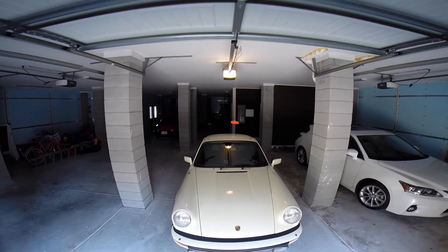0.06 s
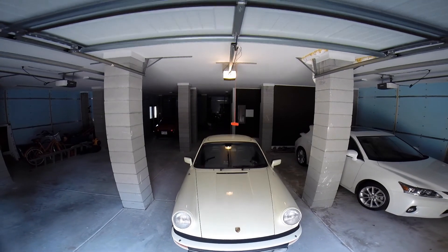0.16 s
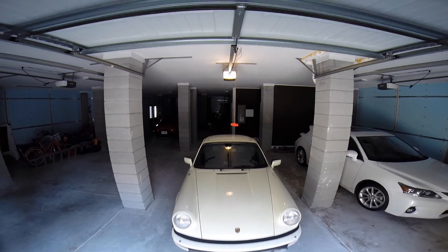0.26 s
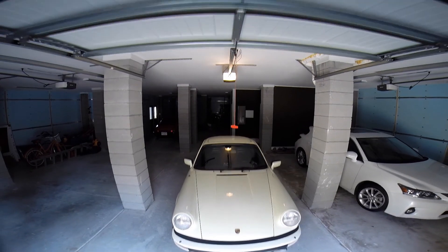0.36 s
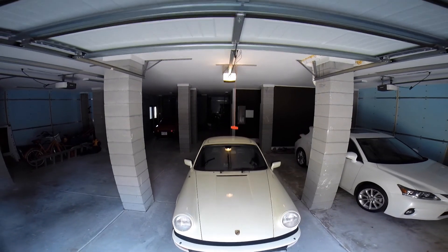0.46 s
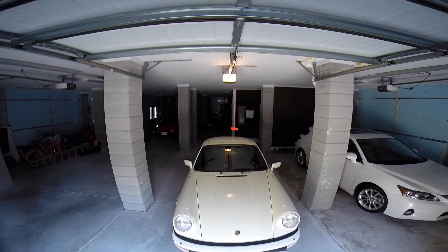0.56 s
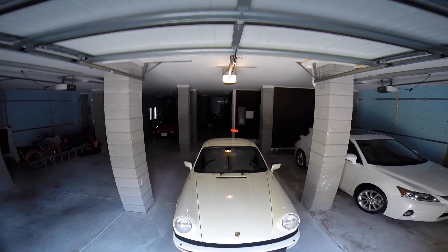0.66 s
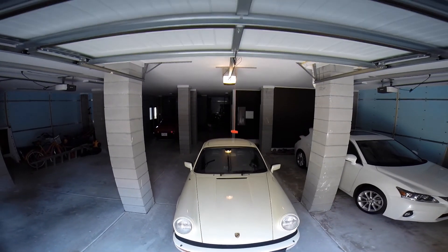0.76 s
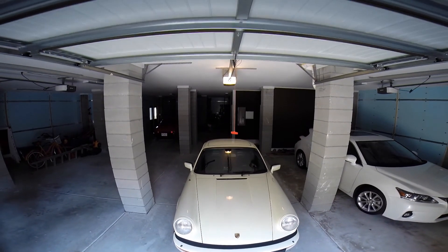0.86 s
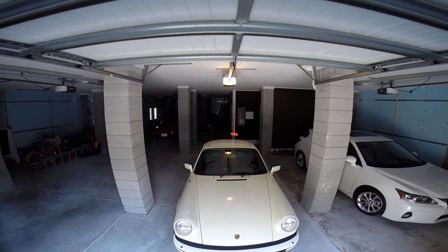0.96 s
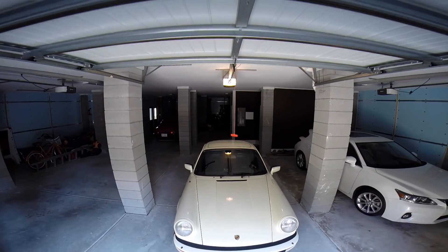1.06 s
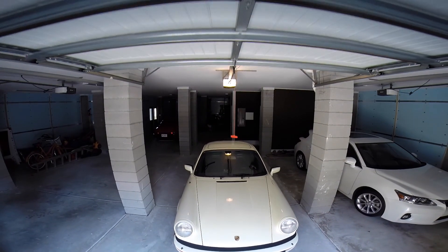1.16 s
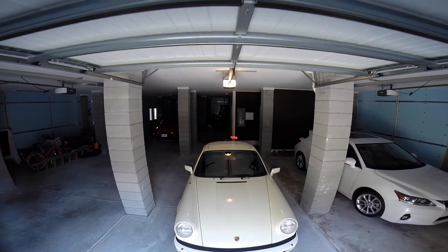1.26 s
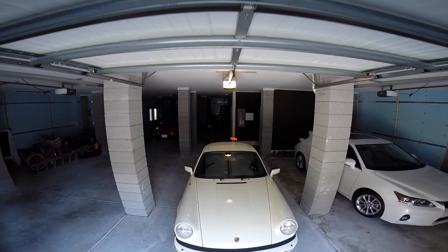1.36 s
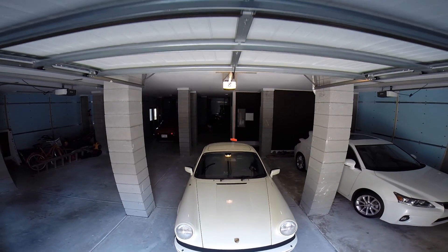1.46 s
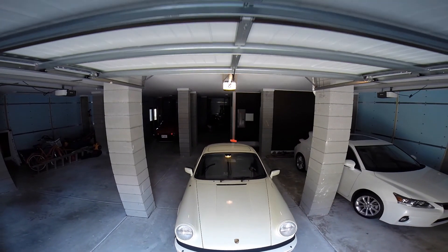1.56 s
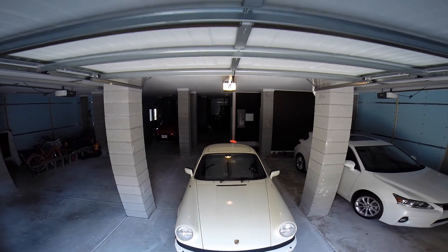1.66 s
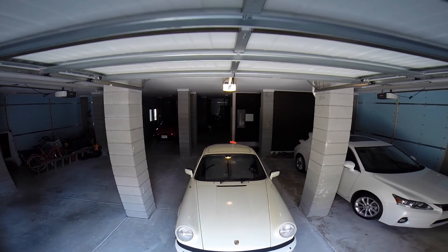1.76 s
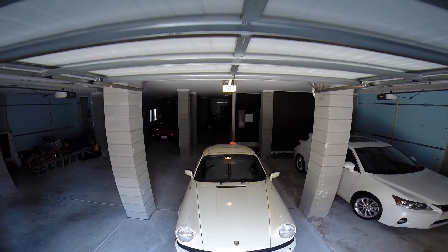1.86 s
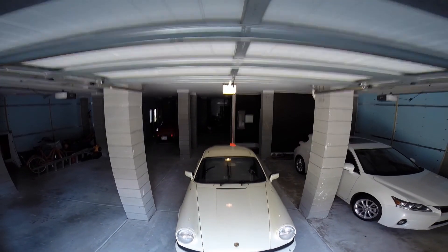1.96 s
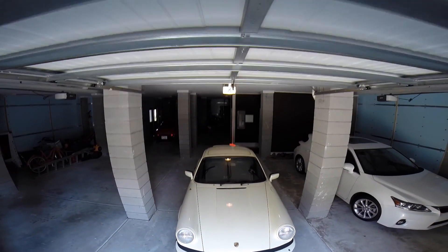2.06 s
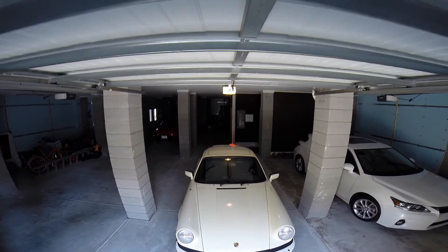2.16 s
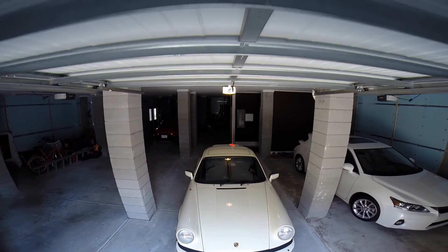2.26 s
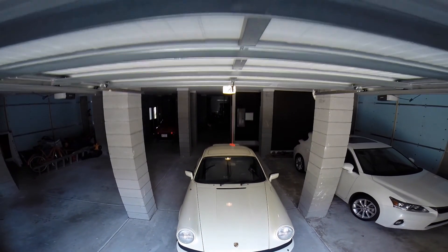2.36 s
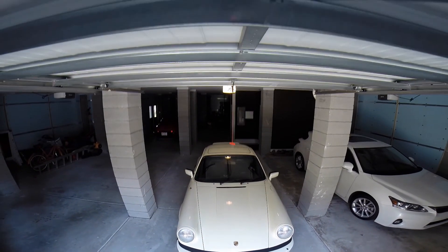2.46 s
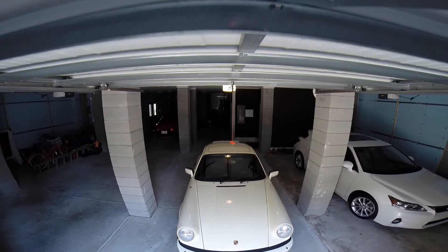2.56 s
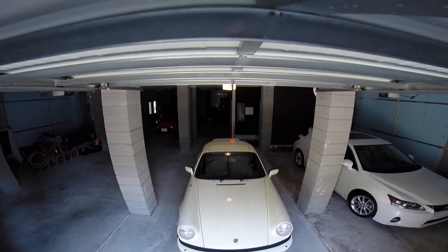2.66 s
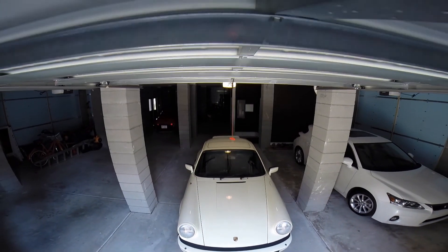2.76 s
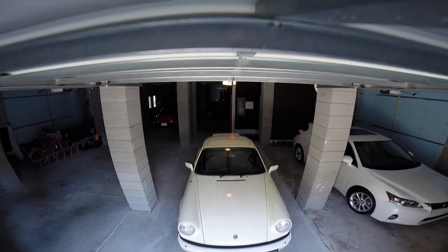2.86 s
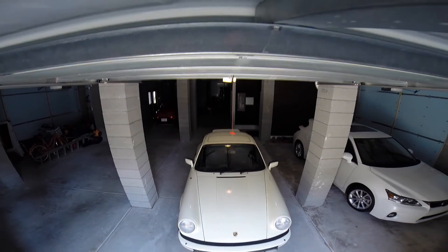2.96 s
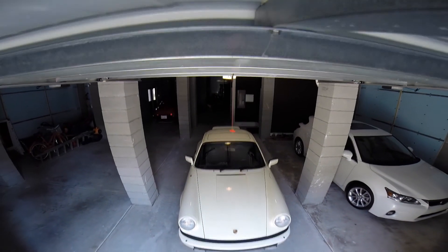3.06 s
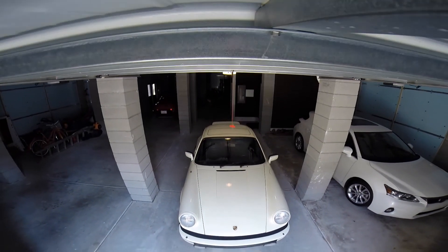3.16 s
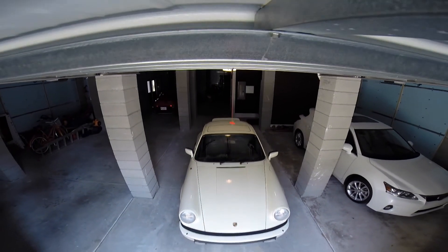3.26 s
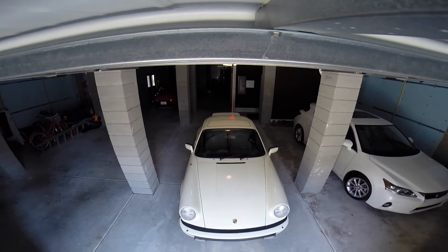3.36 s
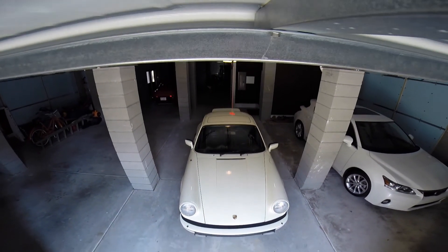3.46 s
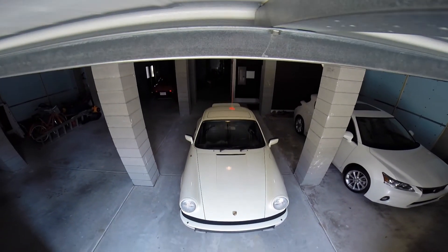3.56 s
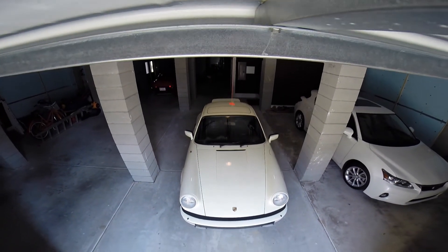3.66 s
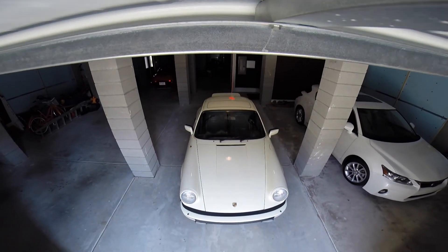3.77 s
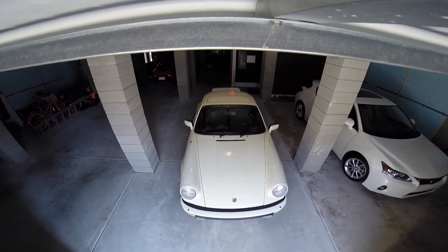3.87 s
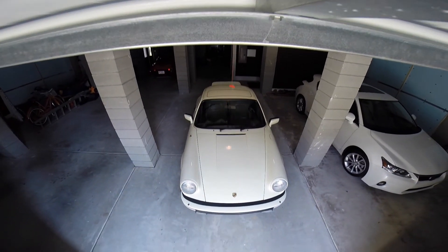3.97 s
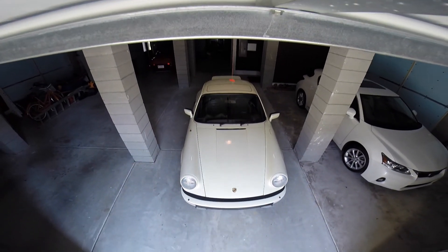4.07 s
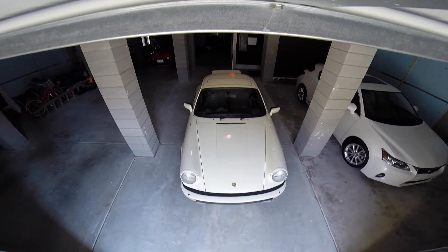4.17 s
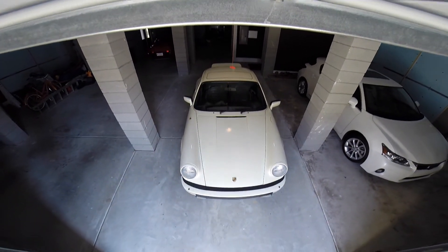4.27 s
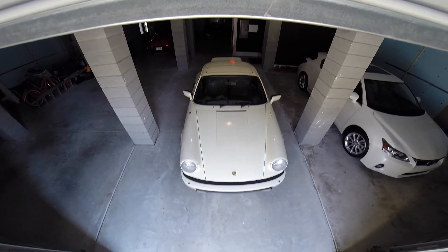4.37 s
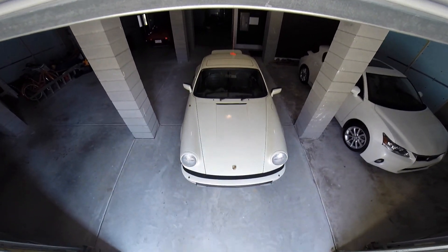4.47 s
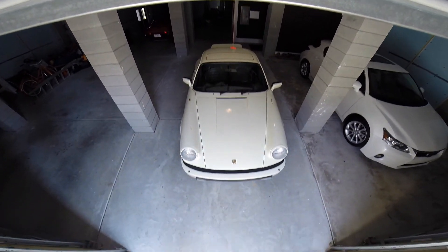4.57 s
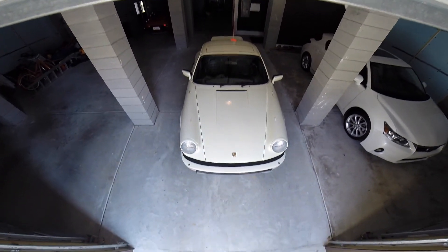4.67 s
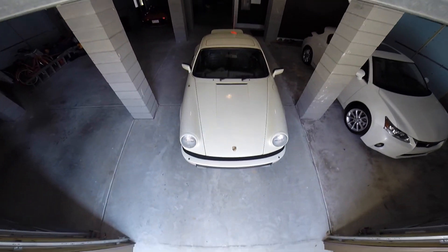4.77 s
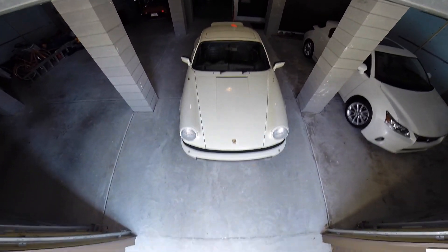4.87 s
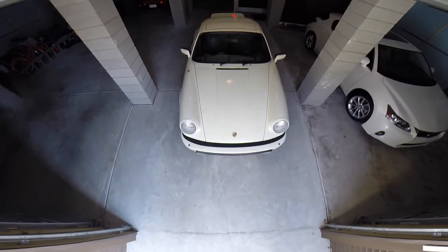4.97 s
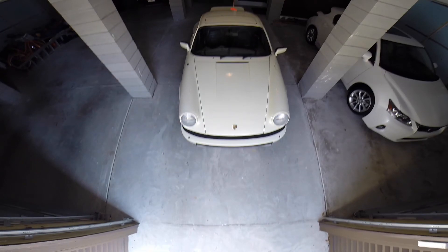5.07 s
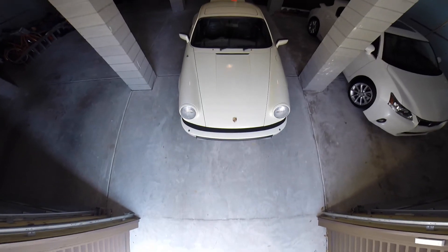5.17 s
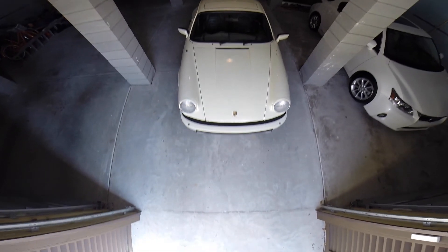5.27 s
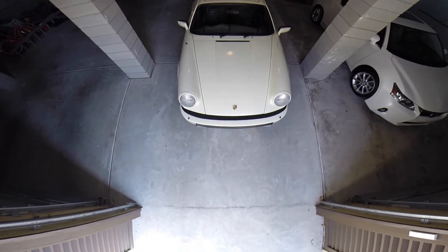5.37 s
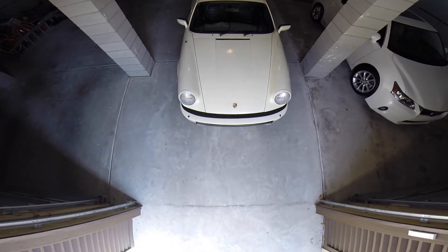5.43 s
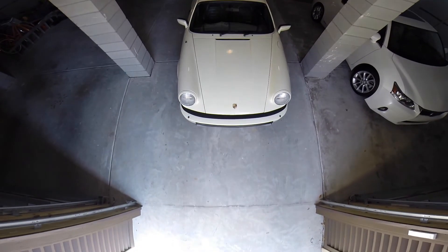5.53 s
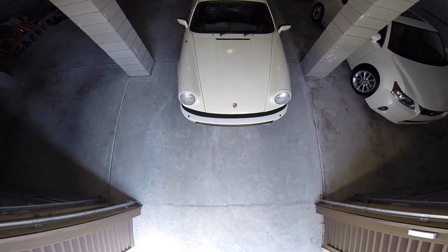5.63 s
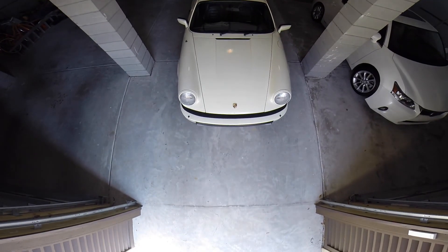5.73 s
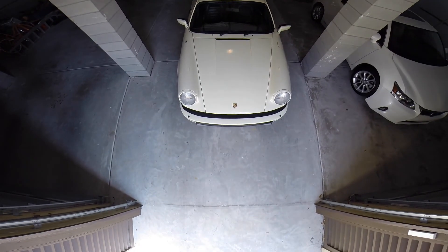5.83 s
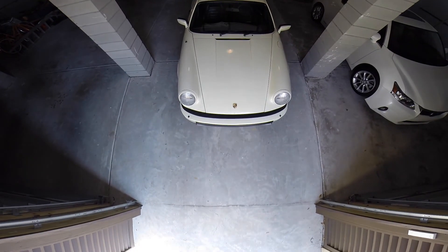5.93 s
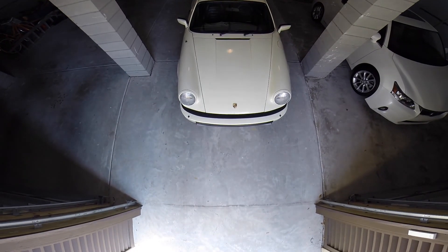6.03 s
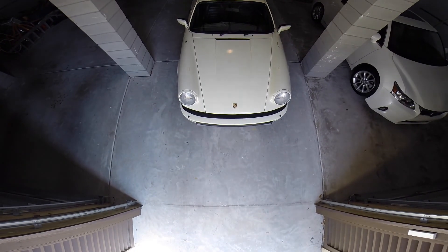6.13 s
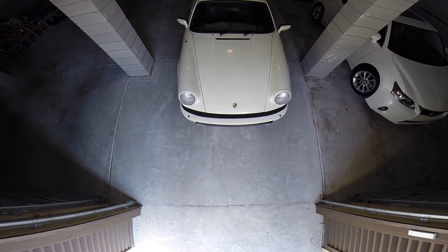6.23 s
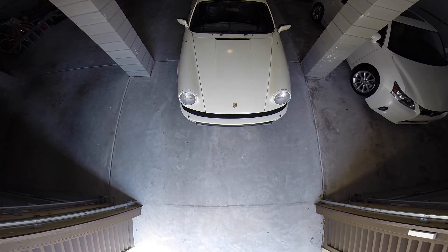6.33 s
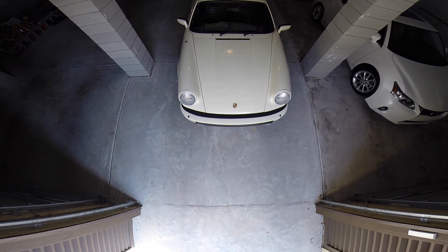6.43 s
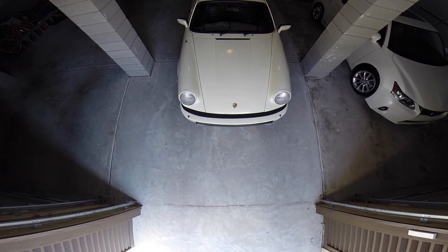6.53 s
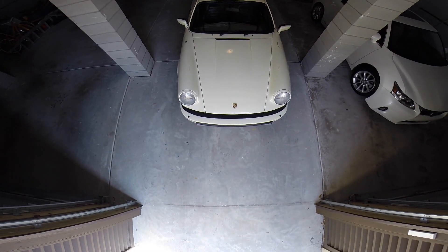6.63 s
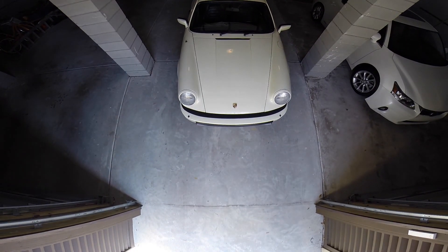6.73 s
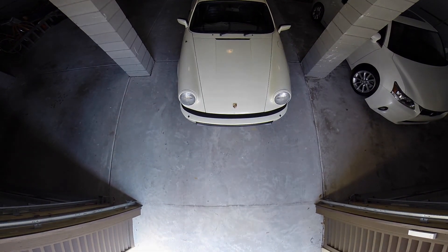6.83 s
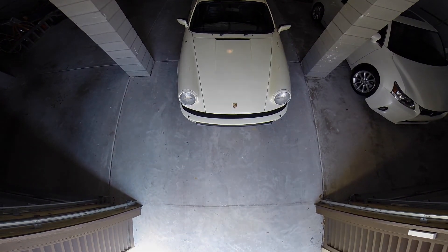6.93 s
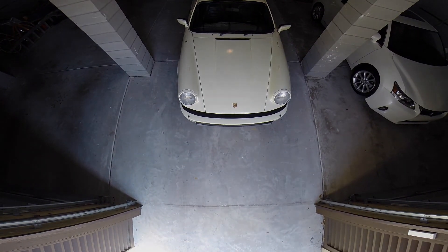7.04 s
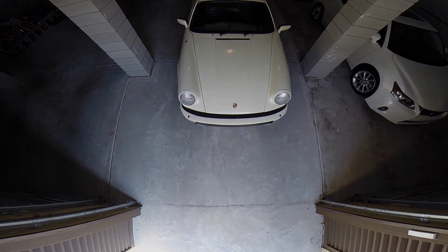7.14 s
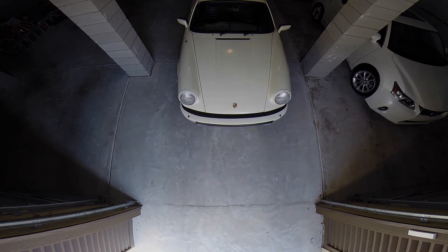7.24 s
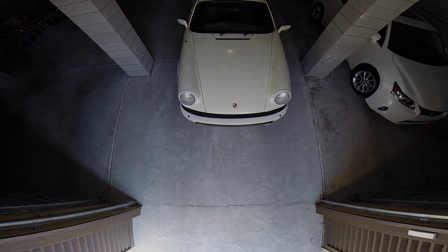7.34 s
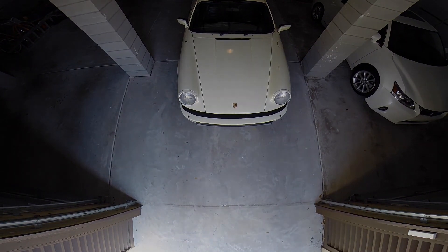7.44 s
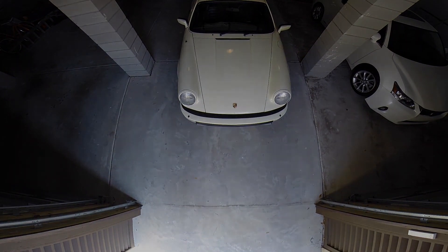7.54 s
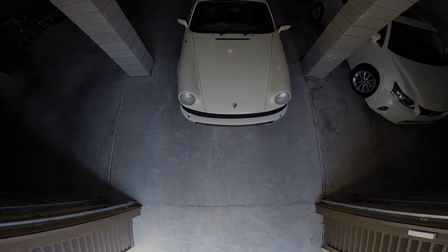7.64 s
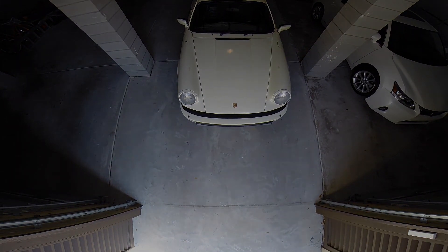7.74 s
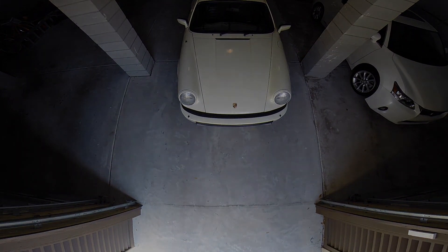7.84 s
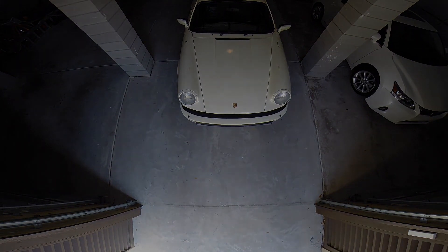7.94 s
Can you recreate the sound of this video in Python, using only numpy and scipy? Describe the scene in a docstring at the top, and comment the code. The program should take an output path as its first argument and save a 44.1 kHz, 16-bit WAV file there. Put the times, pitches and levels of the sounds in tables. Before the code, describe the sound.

The microphone rides on a sectional steel garage door in a concrete garage. At once the drive takes up the load: a burst of hard, ringing hinge clanks in the first 0.3 seconds, with a low boom. A steady electric hum, gently swelling and sinking, runs under rumbling rollers and jingling hardware. Another clank sounds at 1.25, then a short dry scrape around 1.5. Dull boom rises after 2; softer clanks come near 2.45, with roller knocks clustering from 2.8 to 3.1 and close, even plastic ticks until about 3.5. A bodied thump falls at 3.9. At 4.9 a strong clank begins a louder, hollow grinding stretch. The door stops at 5.5 with a dull knock; hum cuts quickly, rattles die and panels shudder down. Faint air noise and a thin high whine remain, with one soft far tap at 7.6.

```python
"""An electric opener pulls a sectional steel door up its tracks in a concrete garage, heard from the door itself.
The motor hums by magnetic force at twice the mains rate and its multiples; rollers rumble and rattle
by dense random contacts; hinges clank as blows that ring the steel modes when the panels turn the bend.
Dry ticks come from the microphone mount. The door stops after five and a half seconds and its panels
shudder out by exponential decay over faint air noise, a thin whine and one soft far tap."""
import sys
import numpy as np
from scipy import signal
from scipy.fft import rfft, irfft
from scipy.io import wavfile
from scipy.ndimage import uniform_filter1d

SR = 44100
rng = np.random.default_rng(int(sys.argv[2]) if len(sys.argv) > 2 else 0)


def wav_record(signal):
    """Record a signal, one row per channel, as 16-bit PCM in the file named by sys.argv[1]."""
    frames = np.transpose(np.atleast_2d(signal))
    bounded = np.clip(frames, -1, 1)
    # unit amplitude maps onto the largest positive 16-bit level
    quanta = np.round(bounded * 32767).astype(np.int16)
    wavfile.write(sys.argv[1], SR, quanta)


N = 352796
T = np.arange(N) / SR
RING_T = T[:SR]  # one second for each blow or impulse response
STOP_S = 5.502  # the drive stops


def undb(db):
    """Decibels to amplitude gain."""
    return 10 ** (np.asarray(db) / 20)


def unit(x, size=None):
    """Normalise to rms 1, judged on the first size samples."""
    return x / np.sqrt(np.mean(x[:size] ** 2))


def gains(table):
    """Interpolate one gain curve per dB column against the time column."""
    s, *columns = np.transpose(table)
    return [undb(np.interp(T, s, c)) for c in columns]


def spectrum_gain(x, gain_db):
    """Zero-phase filtering: weight the spectrum by gain_db, a function of frequency in Hz."""
    f = np.maximum(np.fft.rfftfreq(len(x), 1 / SR), 1)
    return irfft(rfft(x) * undb(gain_db(f)), len(x))


def colour(x, points):
    """Spectral shaping by a (Hz, dB) outline, interpolated over log frequency."""
    hz, db = np.transpose(points)
    return spectrum_gain(x, lambda f: np.interp(np.log(f), np.log(hz), db))


def resonance(x, hz, boost_db, octaves):
    """Resonance as a Gaussian hump of the spectrum around hz."""
    return spectrum_gain(x, lambda f: boost_db * np.exp(-0.5 * (np.log2(f / hz) / octaves) ** 2))


def band(x, lo_hz, hi_hz, order=4):
    """Causal Butterworth band-pass."""
    return signal.sosfilt(signal.butter(order, [lo_hz, hi_hz], "band", fs=SR, output="sos"), x)


def walk(rate):
    """Smoothed random steps, rate per second, with rms 1."""
    k = int(SR / rate)
    steps = np.repeat(rng.standard_normal(N // k + 1), k)
    return unit(uniform_filter1d(uniform_filter1d(steps, k), k)[:N])


def fade(t60):
    """Exponential decay by 60 dB in t60 seconds, over one second."""
    return np.exp(-np.log(1000) * RING_T / max(t60, 1e-4))


def add(out, s, x):
    """Superpose x on out from time s."""
    i = max(int(s * SR), 0)
    out[i:i + len(x)] += x[:N - i]


def run_down(tau_s, lead_s=0):
    """Exponential run-down: one while the drive runs, decaying from lead_s before the stop."""
    return np.exp(-np.maximum(T + lead_s - STOP_S, 0) / tau_s)


# Hum swelling and sinking as the door carries the microphone through the room, before the line trims.
# Columns: time_s, line_120hz_db, line_240hz_db
HUM_LEVELS = [(0.0, -49, -39.5), (0.7, -40, -43), (1.3, -48, -38.5), (1.75, -39, -38.5), (2.65, -30, -41.5),
              (3.1, -36.5, -42), (3.58, -33, -44), (3.88, -43, -46), (4.38, -29.5, -50), (5.05, -36.5, -43),
              (5.4, -46, -43.5)]
# Lines of the turning rotor, the lowest beating against the hum.
# Columns: multiple of the shaft rate, mean level_db
ROTOR_LINES = [(4, -45.5), (7, -56), (8, -54), (10, -54)]
SHAFT_HZ = 28.96
HUM_FLUTTER_DB, MOTOR_STOP_S, ROTOR_STOP_S = 1.24, 0.031, 0.34  # rms waver; run-down time constants


def motor():
    """Periodic magnetic force hums at twice the mains rate; the slipping rotor adds its own lines."""
    # a slight random waver in the level of the hum
    low, high = (g * undb(HUM_FLUTTER_DB * walk(12)) * run_down(MOTOR_STOP_S) for g in gains(HUM_LEVELS))
    phase = 2 * np.pi * 120 * T
    first = undb(1.5) * low * np.sin(phase + 0.56 * walk(6))
    second = undb(4.5) * high * np.sin(2 * phase + 0.089 * walk(4.8))
    fourth = undb(-20.0) * high * np.sin(4 * phase + 1.05 * walk(7))
    rotor = 0
    for multiple, db in ROTOR_LINES:
        line = np.sin(2 * np.pi * multiple * SHAFT_HZ * T + 0.5 * walk(2.6))
        rotor = rotor + undb(db + 2 * walk(2)) * line
    return first + second + fourth - rotor * run_down(ROTOR_STOP_S)


# Drag on the rollers, rising each time a panel rides into the bend, as roller noise before its trim.
# Columns: time_s, roller_noise_db
DRAG_LEVELS = [(0.0, -36), (0.5, -40.5), (0.9, -43.5), (1.25, -41), (1.5, -38.5), (1.8, -43), (2.2, -40),
               (2.92, -37.5), (3.6, -41), (4.5, -43), (4.85, -40.5), (5.07, -36.5), (5.48, -37)]
USUAL_DRAG_DB = -40


def drag():
    """Friction load on the rollers as a multiple of the usual."""
    return gains(DRAG_LEVELS)[0] / undb(USUAL_DRAG_DB)


# Spectrum of the flexing panels. Columns: frequency_hz, gain_db
FLEX_OUTLINE = [(20, -9.5), (30, -4.5), (42, 1.5), (60, 0), (85, 0), (115, -4), (160, -5.5), (210, -10.5),
                (300, -3.5)]
# The boom steps up as the panel with the microphone enters the bend and as it tips flat.
# Columns: time_s, rise_db
BOOM_STEPS = [(2.05, 3.5), (4.92, 3.5)]
BOOM_DB, DRONE_DB, DRONE_GROWTH = -44.5, -42.5, 0.27  # base level; at the usual drag; dB per dB of drag
JERK_DB, JERK_S = 7.5, 0.22  # extra boom as the drive takes up the door, and its time constant
BOOM_STOP_S, DRONE_STOP_S = 1.06, 0.56  # shudder time constants after the stop
DRONE_REST_DB = -67.5  # what stays in the still garage


def panels():
    """Forced flexure of large panels booms as low noise; damping lets them shudder on after the stop."""
    steps_db = sum(db * np.clip((T - s) / 0.06, 0, 1) for s, db in BOOM_STEPS)
    jerk_db = JERK_DB * np.exp(-T / JERK_S)
    boom = undb(BOOM_DB + steps_db + jerk_db) * run_down(BOOM_STOP_S)
    driven = undb(DRONE_DB) * drag() ** DRONE_GROWTH * run_down(DRONE_STOP_S)
    drone = np.hypot(driven, undb(DRONE_REST_DB))
    shake = colour(rng.standard_normal(N), FLEX_OUTLINE)
    deep, hollow = band(shake, 20, 120), band(shake, 120, 230)
    return boom * unit(deep) + drone * unit(hollow)


# Modes of panels, hinges and track. Columns: frequency_hz, relative level_db, t60_s
STEEL_MODES = [(652.5, 0.5, 0.79), (696, -9, 0.93), (730, -11.5, 0.34), (866, -13, 0.22), (869, 1, 0.33),
               (980, 2.5, 0.51), (1084, -5, 0.46), (1197, -0.5, 0.62), (1180, 5.5, .3), (1618, 0, 0.36),
               (1890, -3, 0.31), (1971, 7, 0.24), (2146, 1.5, 0.27), (2194, -2.5, 0.44), (2290, -7, 0.59),
               (2570, -19.5, 0.26), (2790, 8.5, 0.12), (2940, -10.5, 0.12), (2870, 5, 0.17),
               (3190, 0.5, 0.18), (4180, 4, 0.23), (4660, -3, 0.18), (5200, 7.5, 0.18), (6040, -1, 0.12),
               (6050, -4.5, 0.1), (5860, 3, 0.22), (6500, -14, 0.21), (6470, -2.5, .22), (7300, 4.5, 0.22)]


def steel_modes():
    """Modal decay: each steel mode rings as a damped sine at random phase, one row per mode."""
    return np.array([undb(db) * fade(t60) * np.sin(2 * np.pi * (hz * RING_T + rng.random()))
                     for hz, db, t60 in STEEL_MODES])


# Spectrum of the rolling contacts. Columns: frequency_hz, gain_db
ROLL_OUTLINE = [(200, 0), (280, 0), (390, -1.5), (530, -2.5), (690, -1), (900, -2.5), (1220, -11.5),
                (1380, -16.5), (1700, -15.5), (2050, -11), (2850, -20.5), (3400, -21), (4200, -29.5),
                (5200, -27.5), (6800, -33), (9000, -43), (14000, -53.5)]


def chatter(modes, rate, spread_db, t60, modes_db):
    """Random impact process convolved with the door's response; an even wash replaces it after the stop."""
    hits = (rng.random(N) < rate / SR) * rng.choice([-1, 1], N)
    hits = hits * undb(spread_db * np.minimum(rng.exponential(size=N), 3.5))
    contacts = np.where(T < STOP_S, unit(hits), rng.standard_normal(N))
    tail = fade(t60) + undb(-11) * fade(0.97)
    response = rng.standard_normal(SR) * tail + undb(modes_db) * modes.sum(axis=0)
    return colour(signal.fftconvolve(contacts, response)[:N], ROLL_OUTLINE)


# A dry stem rubs for a moment. Columns: middle_s, half_length_s, scraping_rise_db, hardware_rise_db
STEM_RUBS = [(1.507, 0.14, 8.5, 3.5), (4.32, .1, 2, 0), (5.35, 0.099, 1.5, 1)]
# loose hardware and scraping stems: level at the usual drag (dB), growth (dB per dB of drag)
LOOSE_DB, LOOSE_GROWTH = -56.5, 1.22
SCRAPE_DB, SCRAPE_GROWTH = -65.5, 0.37
ROLL_STOP_S, RATTLE_STOP_S = 0.2, 0.11  # time constants of the run-down
SCRAPE_LEAD_S = 0.049  # the stems begin to die away this long before the rollers


def travel(modes):
    """Rolling and friction noise: rollers drum, loose hardware jingles and stems scrape, growing with drag."""
    load = drag()
    roll = undb(USUAL_DRAG_DB) * load * run_down(ROLL_STOP_S)
    loose = undb(LOOSE_DB) * load ** LOOSE_GROWTH * run_down(RATTLE_STOP_S)
    scrape = undb(SCRAPE_DB) * load ** SCRAPE_GROWTH * run_down(RATTLE_STOP_S, SCRAPE_LEAD_S)
    for s, half_s, scrape_db, loose_db in STEM_RUBS:
        dry_stem = np.exp(-((T - s) / half_s) ** 4)
        scrape = scrape * undb(scrape_db * dry_stem)
        loose = loose * undb(loose_db * dry_stem)
    drum = sum(chatter(modes, rate=300, spread_db=0.5, t60=0.085, modes_db=-37.5) for _ in range(3))
    drum = band(drum, 213, 1350)
    # on the last stretch the door grinds in the bend and drives its hollow resonance
    bend = np.interp(T, [4.88, 4.97, 5.55, 5.9], [0, 1, 1, 0])
    drum = drum + bend * (resonance(drum, hz=856, boost_db=6.5, octaves=0.031) - drum)
    jingle = band(chatter(modes, rate=400, spread_db=0.5, t60=0.031, modes_db=-33.5), 1180, 3650)
    rub = band(chatter(modes, rate=700, spread_db=1.0, t60=0.045, modes_db=-44), 3440, 14000)
    return undb(-0.67) * roll * unit(drum) + loose * unit(jingle) + scrape * unit(rub)


# Spectrum of the air noise. Columns: frequency_hz, gain_db
AIR_OUTLINE = [(88, -28.5), (150, -0.5), (267, -4.5), (357, -4), (485, -8.5), (952, -5.5), (1130, -14),
               (3740, -25.5), (5180, -28), (6050, -21.5), (6530, -33), (11400, -35), (15000, -48)]
# Thin whine of the electronics. Columns: frequency_hz, level_db
WHINE_LINES = [(5846, -78.5), (11687, -94.5), (11719, -83), (14626, -91)]
AIR_DB = -65.5


def garage():
    """Broadband air noise, one soft far tap as a decaying noise burst, and steady electronic whine tones."""
    air = unit(band(colour(rng.standard_normal(N), AIR_OUTLINE), 220, 16000))
    air = air * undb(AIR_DB + 0.5 * walk(2.4))
    tap = band(rng.standard_normal(SR), 230, 690) * fade(0.23)
    add(air, 7.598, undb(-63) * unit(tap, size=1300))
    whine = sum(undb(db) * np.sin(2 * np.pi * hz * T + 0.5 * walk(40)) for hz, db in WHINE_LINES)
    return air + whine


# Spectrum of a blow on the door. Columns: frequency_hz, gain_db
BLOW_OUTLINE = [(180, -33), (300, -7), (403, -7.5), (490, -11.5), (841, -0.5), (912, -4.5), (1190, -8),
                (1470, -13.5), (2280, -8.5), (3490, -15.5), (3970, -21.5), (6280, -19), (9000, -42),
                (10800, -43.5), (15000, -60)]
# Edges of the four registers (body, clang, ring, crack). Column: frequency_hz
REGISTER_EDGES = [230, 1350, 3850, 8400, 16000]
# low bending waves come late and stay:
# (share of the contact time, share of the ring time, room share dB, room t60 s)
REGISTER_DECAYS = [(1.8, 2.6, 1.0, 1.2), (0.75, 0.97, 1.5, 0.69), (0.7, 0.63, 0.5, 0.66), (0.8, 0.73, -8, 0.25)]


def blow(modes, levels_db, part_hz, part_db, sheet_t60, modes_db, room_db, rise_s):
    """Impact excitation: crowded sheet modes, clear steel modes and the concrete room, in four registers."""
    # each blow lands elsewhere and so weights the modes anew
    weights = rng.choice([-1, 1], len(modes)) * undb(2 * rng.standard_normal(len(modes)))
    sheet = colour(rng.standard_normal(SR), BLOW_OUTLINE)
    clear = undb(modes_db) * colour(weights @ modes, BLOW_OUTLINE)
    # the struck parts favour their own resonances
    for hz in part_hz:
        sheet, clear = (resonance(x, hz, part_db, octaves=0.12) for x in (sheet, clear))
    out = 0
    for k, (late, stay, wet_db, room_t60) in enumerate(REGISTER_DECAYS):
        # soft onset, and a taper to silence over the second
        contact = (1 - np.exp(-RING_T / max(rise_s * late, 1e-4))) * (1 - RING_T ** 2)
        decay = fade(sheet_t60 * stay) + undb(room_db + wet_db) * fade(room_t60)
        ring = contact * (sheet * decay + clear)
        register = band(ring, REGISTER_EDGES[k], REGISTER_EDGES[k + 1])
        out = out + undb(levels_db[k]) * unit(register, size=1300)
    return out


# Hinges and panel joints snapping over; levels before the trim, times before the register shares.
# Columns: start_s, clang_db, body_re_clang_db, ring_re_clang_db, hinge_hz, pin_hz, ring_s, contact_s
JOINT_CLANKS = [(0.0217, -31.5, 4.5, -11, 2670, 5430, 0.071, 0.0023),
                (0.037, -22.5, -3, -8, 2260, 5170, 0.19, 0.00071),
                (0.1822, -27.5, -2.5, -14.5, 2900, 4910, .12, .0036),
                (0.3068, -25.5, -0.5, 0, 3070, 6420, 0.22, .0034),
                (1.2537, -31.5, -8, -12, 3100, 4600, 0.14, .0011),
                (2.4368, -36.5, -0.5, -7, 2140, 5100, .24, 0.0053),
                (2.4951, -39, 5, -11, 2150, 4730, 0.22, .0045),
                (3.8648, -37, 9.5, -26, 2710, 5300, 0.33, 0.00058),
                (4.883, -31, -7, -29, 2700, 5000, .08, .0017),
                (4.8884, -26.5, 4, -12.5, 2530, 5060, 0.2, 0.0024),
                (5.4915, -38, 8.5, -41, 2770, 5320, 0.077, 0.0047)]
CRACK_DB = -17.5  # the crack on top of a clank, relative to its ring


def clanks(modes):
    """Impact on taking up load: panel joints snap over as they turn the bend and strike the steel."""
    out = np.zeros(N)
    for s, db, body_db, ring_db, hinge_hz, pin_hz, t60, rise_s in JOINT_CLANKS:
        levels_db = [db + body_db, db, db + ring_db, db + ring_db + CRACK_DB]
        add(out, s, blow(modes, levels_db, [hinge_hz, pin_hz], part_db=5.5, sheet_t60=t60,
                         modes_db=-23.5, room_db=-18.5, rise_s=rise_s))
    return out * undb(-6.5)


# Rollers knocking in the track, levels before the trim. Columns: start_s, clang_db, ring_re_clang_db
ROLLER_KNOCKS = [(0.242, -43, -29), (0.395, -36, -22), (0.484, -46, -21), (0.755, -45.5, -16),
                 (0.828, -45, -10), (1.317, -48, -10), (1.382, -51, -4), (2.024, -49.5, -27),
                 (2.762, -41.5, -18), (2.784, -42.5, -15), (2.837, -38, -13), (2.933, -39, -13),
                 (2.975, -46.5, -15), (3.021, -42.5, -11), (3.112, -40.5, -9), (3.429, -46.5, -14),
                 (3.898, -52, -23), (3.936, -41.5, -14.5), (5.181, -50, -18), (5.279, -49, -20),
                 (5.369, -51, -14), (5.414, -46, -20)]


def knocks(modes):
    """Light impact: rollers knock against the track wall, with short ringing and little treble."""
    out = np.zeros(N)
    for s, db, ring_db in ROLLER_KNOCKS:
        levels_db = [db + 4.0, db, db + ring_db, db + ring_db - 17]
        add(out, s, blow(modes, levels_db, [1230, 2050, 2850], part_db=6.5, sheet_t60=0.069,
                         modes_db=-24, room_db=-11.5, rise_s=0.0015))
    return out * undb(-5.5)


# Runs of dry stick-slip ticks as the microphone mount takes up strain; levels before an 11 dB lift.
# Columns: start_s, length_s, gap_s, first_peak_db, last_peak_db
STICK_SLIP_RUNS = [(0.656, .03, .06, -53, -48), (2.075, .15, 0.053, -48, -52),
                   (3.019, .23, .0652, -47.5, -55), (3.288, .28, 0.061, -45, -41)]
# Fine rustles of the mount. Columns: start_s, level_db
MOUNT_RUSTLES = [(2.438, -56.5), (2.496, -64), (3.459, -67)]


def mount():
    """Stick-slip of the plastic mount right at the microphone, so without room: even ticks and fine rustles."""
    tick = 0
    for hz, db, t60 in [(3610, 0.5, 0.0097), (5120, 8, 0.0026), (6200, -4, 0.0022)]:
        tick = tick + undb(db) * fade(t60) * np.sin(2 * np.pi * hz * RING_T)
    tick = band(tick, 2600, 7600)
    tick = tick / np.abs(tick).max()
    out = np.zeros(N)
    for start, length, gap, first_db, last_db in STICK_SLIP_RUNS:
        times = np.arange(start, start + length, gap)
        for s, db in zip(times, np.linspace(first_db, last_db, len(times))):
            add(out, s, undb(db + 11.0) * tick)
    for s, db in MOUNT_RUSTLES:
        rustle = band(rng.standard_normal(SR) * fade(0.18), 5600, 12300)
        add(out, s, undb(db) * unit(rustle, size=1300))
    return out


def scene():
    """Superposition of drive, door and garage; every blow and contact shares the same steel modes."""
    modes = steel_modes()
    door = panels() + travel(modes) + clanks(modes) + knocks(modes)
    return (motor() + door + garage() + mount())[None]


def record(dry):
    """Band limiting: a steep elliptic low-pass at 15 kHz."""
    return signal.sosfilt(signal.ellip(8, 0.2, 70, 15000, fs=SR, output="sos"), dry)


dry = scene()
out = record(dry)
wav_record(out)
```